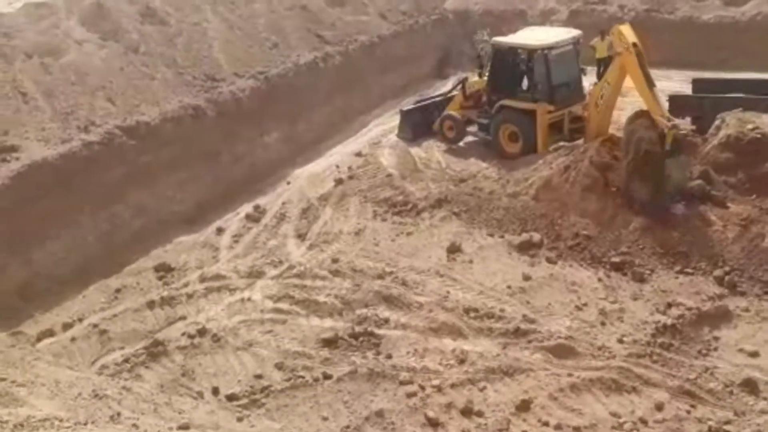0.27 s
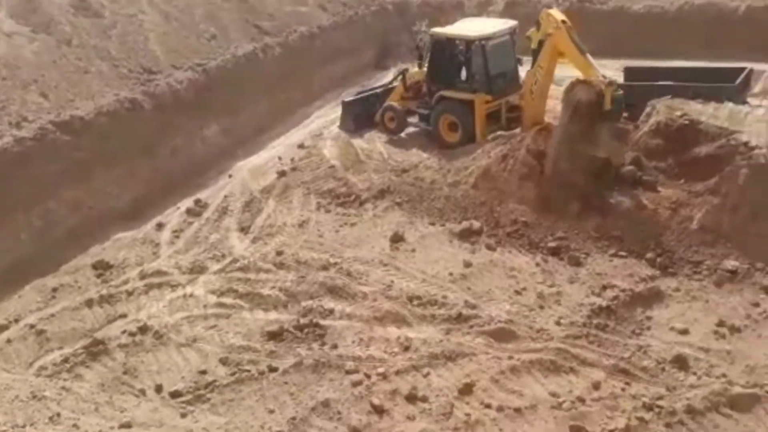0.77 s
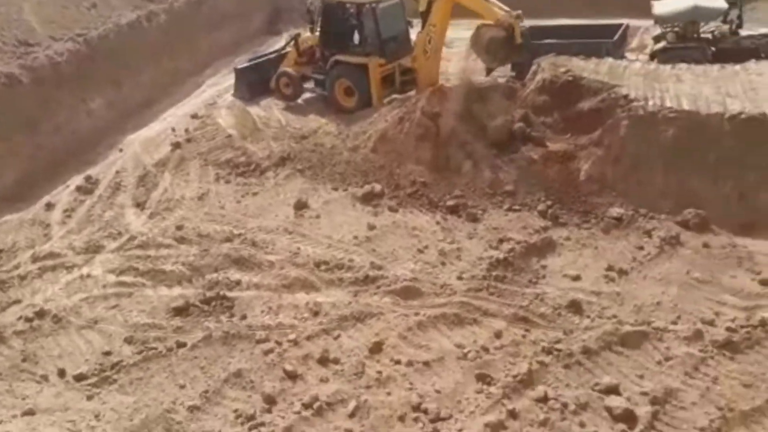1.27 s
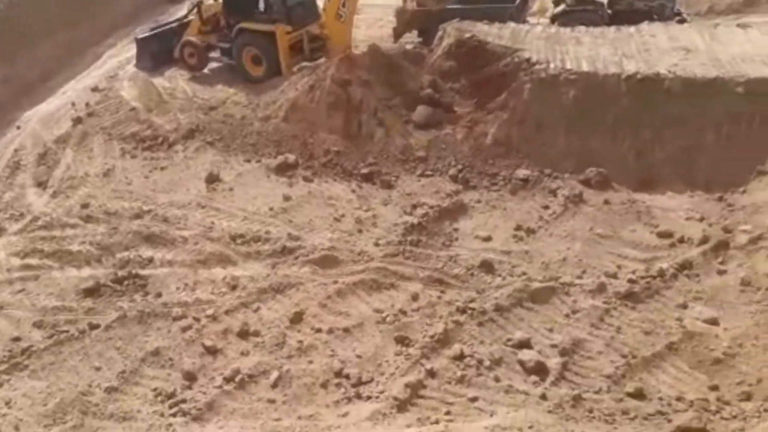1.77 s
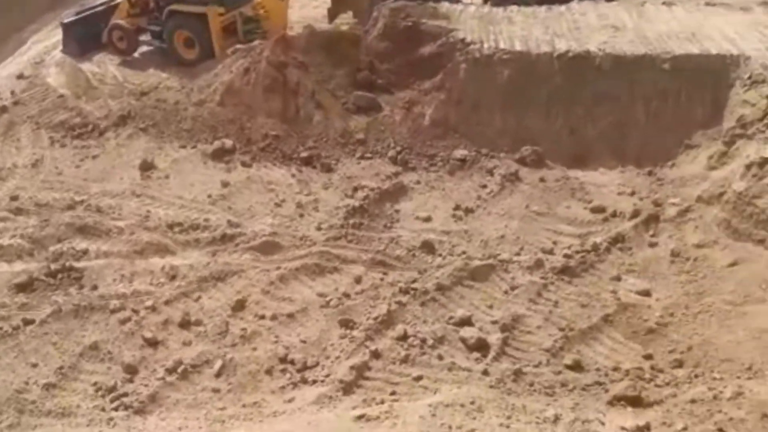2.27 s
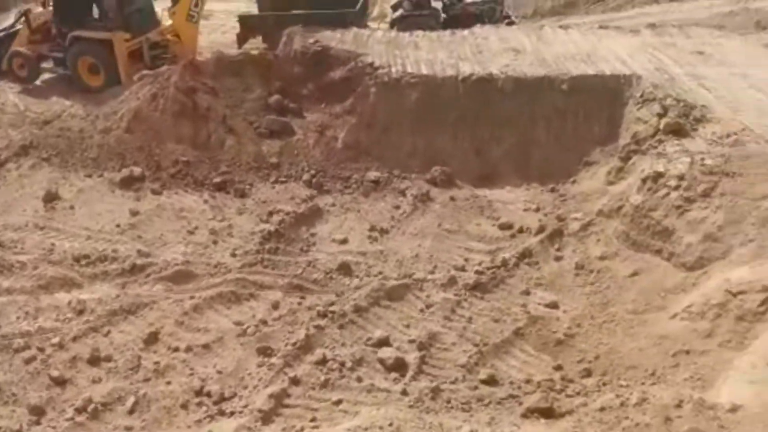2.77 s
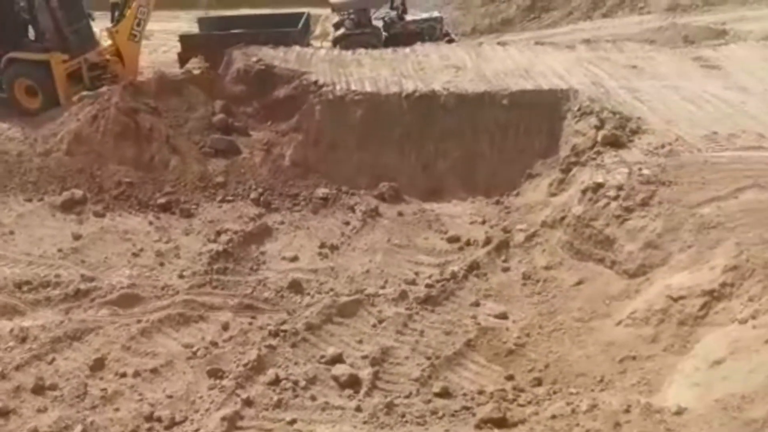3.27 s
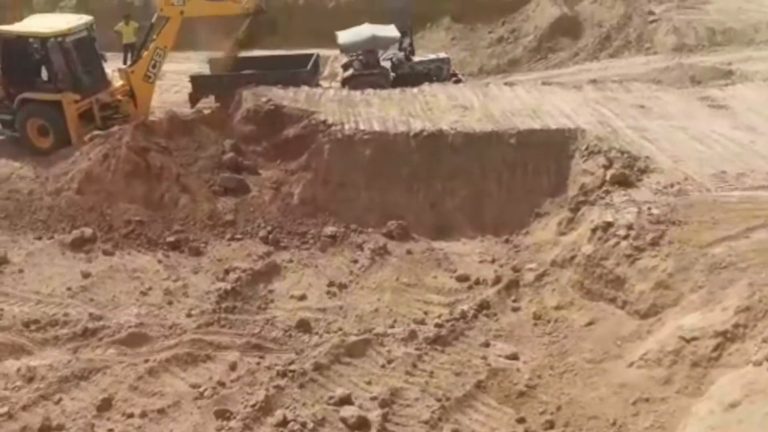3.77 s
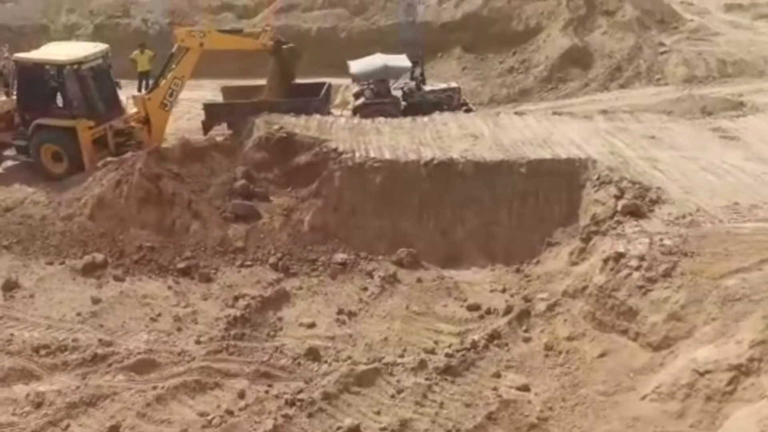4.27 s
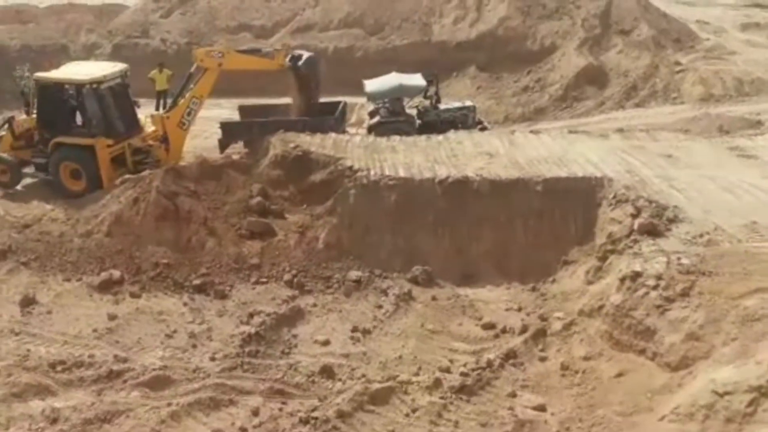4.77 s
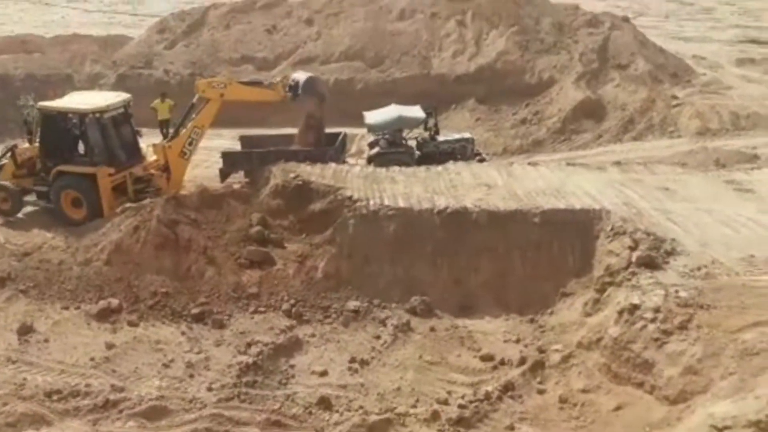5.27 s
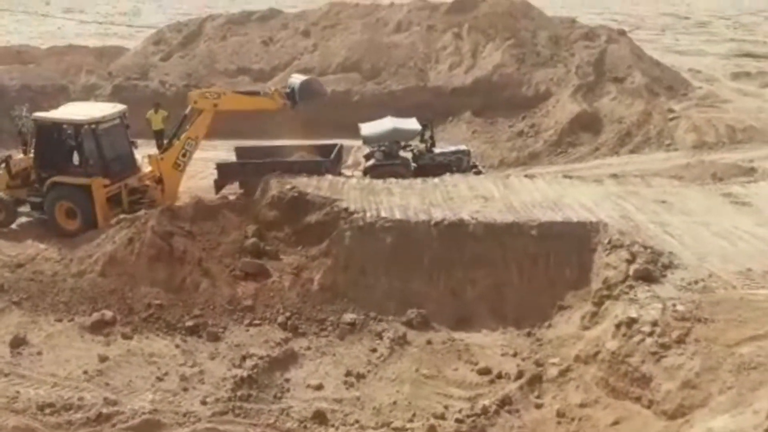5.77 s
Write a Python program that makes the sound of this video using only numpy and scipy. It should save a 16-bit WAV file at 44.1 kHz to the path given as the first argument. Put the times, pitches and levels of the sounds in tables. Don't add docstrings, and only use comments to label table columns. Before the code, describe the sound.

Strong wind booms and tears across a hand-held microphone, then sand and stones crunch on a steel bucket over a distant diesel clatter.

```python
import sys
import numpy as np
from scipy import signal
from scipy.fft import rfft, irfft, next_fast_len
from scipy.io import wavfile
from scipy.ndimage import uniform_filter1d

SR = 44100
rng = np.random.default_rng(int(sys.argv[2]) if len(sys.argv) > 2 else 0)


def how_loud(loudness_db):
    steps = np.asarray(loudness_db, float) / 20
    return 10 ** steps


def materialize(psi):
    bounded = np.clip(np.atleast_2d(psi).T, -1, 1)
    quanta = np.round(bounded * 32767).astype(np.int16)
    wavfile.write(sys.argv[1], SR, quanta)


N = 264688
TIME = np.arange(N) / SR


def level(x, db=0):
    return x * how_loud(db) / np.sqrt(np.mean(x ** 2, axis=-1, keepdims=True))


def noise(channels=2):
    return rng.standard_normal((channels, N))


def colour(x, points):
    size = next_fast_len(N)
    hz, db = np.transpose(points)
    bins_hz = np.arange(size // 2 + 1) * SR / size
    gain = how_loud(np.interp(np.log(bins_hz + 1), np.log(hz), db))
    return irfft(rfft(x, size) * gain, size)[..., :N]


def ring(x, hz, width):
    return signal.lfilter(*signal.iirpeak(hz, hz / width, SR), x)


def dull(x, hz):
    return signal.sosfilt(signal.butter(3, hz, fs=SR, output="sos"), x)


def under(x, hz):
    return signal.sosfiltfilt(signal.butter(2, hz, fs=SR, output="sos"), x)


def walk(rate, channels=1):
    k = int(SR / rate)
    held = np.repeat(rng.standard_normal((channels, N // k + 1)), k, axis=1)
    slewed = uniform_filter1d(uniform_filter1d(held, k), k)
    return 1.28 * slewed[:, :N]


def columns(table):
    s, *rest = np.transpose(table)
    return [np.interp(TIME, s, column) for column in rest]


def bump(s, half):
    return np.exp(-((TIME - s) / half) ** 2)


def sides(pan_db):
    return how_loud(np.array([pan_db, -pan_db]) / 2)


def ports(x, y, alike):
    lag = 5
    near = alike * np.roll(x, lag) + np.sqrt(1 - alike ** 2) * y
    return np.array([x, y + under(near - y, 3440.0)])


def eddies(table, width, top_hz, gain_db):
    size, shared = 6000, 0.29
    out, t = np.zeros((2, N + size)), np.arange(size) / SR
    puffs = rng.standard_normal((len(table), 2, size))
    for (s, db, hz, pan_db, length), puff in zip(table, puffs):
        puff = puff + shared * (puff[0] - puff)
        age = t / max(length, .001)
        shape = (1 - np.exp(-7 * age)) * np.exp(-age)
        burst = dull(ring(ring(puff * shape, hz, width), hz, 3 * width), top_hz)
        burst = burst / abs(burst).max(axis=1, keepdims=True)
        i = int(s * SR)
        out[:, i:i + size] += how_loud(db + gain_db) * sides(pan_db)[:, None] * burst
    return out[:, :N]


# time in seconds, strength in dB,
# angle (0 = along the cavity mouth, 1 = across its edge).
WIND = [(0.0, -30.5, 0.35), (0.22, -32.5, 0.46), (0.42, -40.5, 0.16), (0.7, -39.5, 0.2), (0.9, -35, 0.15),
        (1.33, -33, 0.23), (1.5, -29, 0.18), (1.8, -28.5, 0.45), (2.2, -33.5, 0.41), (2.5, -28, 0.13),
        (2.75, -33.5, 0.048), (3.05, -30.5, 0.17), (3.2, -30.5, 0.7), (3.55, -42.5, 0.82),
        (3.9, -26.5, 0.65), (4.32, -38, 0.82), (4.5, -49, 0.97), (6.0, -46.5, 0.8)]
# time in seconds, change in dB, half length in seconds,
# veer of the angle.
SURGES = [(0.0, 17, 0.0098, 0.45), (0.042, 1, 0.042, 0.19), (0.271, -3.5, 0.029, 0.17),
          (0.812, -18.5, 0.041, 0.18), (1.16, 2, 0.011, 0.0053), (1.304, 8.5, 0.028, 0.22),
          (1.438, -7.5, 0.055, 0.29), (1.63, -1, 0.028, -0.13), (1.722, 8, 0.028, -0.36),
          (1.8, 3, 0.036, 0.067), (1.962, -3, 0.013, 0.0085), (1.992, 6, 0.01, -0.051),
          (2.117, 8, 0.083, -0.16), (2.202, -4, 0.012, -0.34), (2.284, 4.5, 0.025, -0.1),
          (2.404, 10, 0.018, -0.33), (2.697, -16, 0.013, 0.028), (2.799, 5.5, 0.049, 0.076),
          (2.879, -21, 0.055, 0.26), (3.154, 9, 0.024, 0.27), (3.399, -15.5, 0.062, -0.12),
          (3.592, 16, 0.038, -0.17), (4.039, -26, 0.0082, 0.12), (3.861, -17, 0.0056, 0.14),
          (4.103, -11, 0.058, -0.16), (4.26, -8.5, 0.056, -0.059), (4.327, 3.5, 0.04, -0.36),
          (5.263, -2, 0.017, 0.037), (5.383, 5, 0.026, 0.22), (5.518, 7, 0.01, -0.33),
          (0.061, -5, .006, -0.095), (0.943, -9, 0.0065, 0.061), (1.354, -8, 0.0065, 0.081),
          (1.862, 4, 0.0044, -0.056), (1.95, -2, 0.012, 0.14), (2.028, -6.5, 0.0085, -0.18),
          (2.38, -7, 0.0052, 0.12), (2.479, -7, 0.0089, -0.27), (3.006, -9, .005, 0.051),
          (3.706, -8, 0.019, -0.049), (3.759, -12, 0.01, -0.03), (3.773, 1.5, 0.0075, -0.1),
          (3.985, -9, 0.0093, 0.087), (4.6, 3, 0.02, .01), (5.036, -4, 0.058, 0.061)]
# time in seconds, change in dB.
SWELLS = [(.35, 3), (.5, -1), (.72, 3), (.95, 3), (1.62, 2.5), (1.8, -3), (2.05, -3.5), (2.4, 2),
          (2.65, 1.5), (3.159, 1.5), (3.28, 3), (3.44, 3.5), (3.73, -0.5), (4.6, -5.5), (5.15, 1),
          (5.4, -6), (5.56, 4), (5.95, 0)]


def gusts():
    wind_db, angle = columns(WIND)
    surge_db = 0
    for s, db, half, veer in SURGES:
        gust = bump(s, max(half, .005))
        surge_db = surge_db + db * gust
        angle = angle + veer * gust
    angle = np.clip(angle, 0, 1.2)
    now_db = wind_db + surge_db
    cavity_db = now_db + 8.5 - 79 * (angle - 0.35) ** 2
    edge_db = now_db + 9.5 - 42 * np.exp(-angle / 0.11)
    pan_db = 0.1346 * (-24.5 - now_db) + 0.5 * walk(12)[0]
    swell_db = sum(db * bump(s, 0.038) for s, db in SWELLS)
    rumble_db = wind_db + swell_db + 0.61 * surge_db
    return rumble_db, cavity_db, edge_db, pan_db


# frequency in Hz, level in dB per Hz.
RUMBLE = [(25, -28), (50, -7), (80, -5.5), (150, -2), (300, 1.5), (450, 2.5), (700, -7), (1500, -44.5)]
# frequency in Hz, level in dB per Hz.
EDGE = [(500, -18), (900, -2), (1150, 4), (1500, -3), (2200, -13.5), (3200, -22.5), (5000, -41.5),
        (8000, -95)]
# frequency in Hz, width in Hz, level in dB.
OVERTONES = [(2650, 470, -33), (3410, 330, -39), (4570, 250, -43.5)]


def wind():
    rumble_db, cavity_db, edge_db, pan_db = gusts()
    swirl = 1.6 * walk(45) + 2.6 * walk(60, channels=2) + 3 * walk(220, channels=2)
    top_db = 5.5
    swirl = np.where(swirl > 0, top_db * np.tanh(swirl / top_db), swirl)
    swirl = swirl - sum(5.5 * bump(s - 0.008, 0.0033) for s, *_ in EDDIES)
    swirl = swirl - sum(4 * bump(s - 0.0036, 0.0034) for s, *_ in SNAPS)

    rumble_flutter = 0.99 * swirl + 2.4 * walk(18, channels=2) + 0.11 * walk(9.2)
    rumble = level(how_loud(rumble_flutter) * colour(noise() + 0.43 * noise(channels=1), RUMBLE))

    jet = noise() * how_loud(swirl)
    cavity_hz = 768
    cavity = level(dull(ring(ring(jet, cavity_hz, 264), cavity_hz, 920.0), 1920.0))
    for hz, width, db in OVERTONES:
        cavity = cavity + level(ring(ring(jet, hz, width), hz, width), db)

    edge = level(colour(noise() * how_loud(1.03 * swirl + 2.1 * walk(40, channels=2)), EDGE))
    layers = how_loud(rumble_db + 1.5) * rumble + how_loud(cavity_db - 0.5) * cavity + how_loud(edge_db - 6.5) * edge
    return sides(pan_db) * layers


# frequency in Hz, level in dB per Hz.
ENGINE = [(24, -35), (40, 4), (136, 8), (332, -2), (737, -41), (1180, -12), (1640, -24), (1850, -11.5),
          (2760, -14.5), (4540, -17.5), (7660, -25.5), (8460, -22.5), (10600, -32), (12900, -31.5),
          (15400, -29)]
# time in seconds, clatter in dB.
LOAD = [(0.0, -61), (0.67, -65), (1.79, -62.5), (2.15, -63), (2.55, -62), (2.95, -58), (3.18, -53.5),
        (4.2, -48.5), (4.83, -55.5), (5.53, -47.5), (6.0, -54)]


def engine():
    firing_hz = 58.6 * (1 + 0.031 * walk(2.9)[0])
    phase = np.cumsum(firing_hz) / SR
    strength = how_loud(2.5 * rng.standard_normal(N // 100))
    knock = strength[phase.astype(int)] * np.exp(-(phase % 1) / .3)
    clatter = ports(*(noise() * (1.5 + knock) * how_loud(1.2 * walk(5))), alike=.5)
    body = level(colour(clatter, ENGINE), -40.5)
    body = body + level(ring(clatter, 4050., 250.), -65) + level(ring(clatter, 2150., 250.), -66)
    load_db, = columns(LOAD)
    drone = under(body, 4300.)
    bass = under(drone, 500.0)
    drift = 0.61 * walk(40) + 0.51 * walk(25, channels=2)
    bass_change = bass * (how_loud(6.4 * np.tanh(drift) - 7.0) - 1)
    return drone + bass_change + (body - drone) * how_loud(0.68 * (load_db - load_db[-1]))


# start in seconds, peak in dB, frequency in Hz, left minus right in dB.
THUMPS = [(0.021, -35, 72.7, 12), (0.088, -28, 96.9, 8), (0.267, -31, 117, 0), (0.335, -31, 117, 1),
          (0.591, -35, 86.6, -7), (0.673, -34, 116, -3), (0.927, -49, 129, -2.0), (0.928, -28.5, 120, 7),
          (1.194, -31, 94.2, 1.0), (1.336, -37, 99.6, 4), (1.497, -28, 70.0, 6), (1.629, -23, 108, 1),
          (1.764, -26.5, 128, 3.0), (1.908, -30, 130, 2), (1.997, -38, 129, -7), (2.153, -31, 102, 5),
          (2.356, -40, 129, 9), (2.357, -32, 88.8, 1.5), (2.786, -34, 129, -3), (2.974, -31, 102, -8.5),
          (3.134, -30, 129, -4), (3.5, -36, 129, 2), (3.712, -35.5, 91.5, 9), (3.841, -30, 88.8, -2),
          (4.056, -35, 119, 7), (4.138, -25, 96.9, 7), (4.646, -44, 129, -6.5), (4.645, -32, 102, -1),
          (5.214, -42, 129, -4.5), (5.215, -31.5, 129, -3), (5.499, -30.5, 108, -5), (5.626, -36, 80.7, -5)]


def thumps():
    length = 0.023
    return eddies([(*row, length) for row in THUMPS], width=40.0, top_hz=300.0, gain_db=-3.5)


# start in seconds, peak in dB, ring in Hz, length in seconds.
EDDIES = [(0.056, -16.5, 900, 0.07), (0.108, -9.5, 810, 0.0033), (0.178, -19.5, 745, .018),
          (0.903, -27, 800, 0.0015), (1.059, -30, 826, 0.0068), (1.289, -15.5, 734, 0.018),
          (1.511, -16, 860, 0.031), (1.581, -25, 1020, 0.0063), (1.611, -12, 784, 0.0095),
          (1.734, -8.5, 1070, 0.0067), (1.767, -4, 834, 0.0097), (1.86, -18.5, 920, 0.055),
          (1.923, -10, 666, 0.0036), (2.098, -13, 820, 0.0025), (2.415, -10, 880, 0.0063),
          (2.297, -13.5, 864, 0.013), (2.385, -14.5, 820, 0.027), (2.495, -28, 762, 0.032),
          (2.972, -15, 705, 0.024), (3.013, -17, 867, 0.0023), (3.115, -19, 716, 0.017),
          (3.241, -16, 1220, 0.015), (3.267, -18, 1170, 0.0057), (3.602, -28, 1340, 0.0051),
          (4.137, -21.5, 1280, 0.017), (3.814, -16, 644, 0.018), (3.831, -13.5, 1140, 0.008),
          (3.939, -12.5, 1160, 0.017), (4.05, -19.5, 690, 0.0099), (4.378, -19.5, 640, 0.0071)]


def sudden_eddies():
    pans_db = 2.5 + 3.5 * rng.standard_normal(len(EDDIES))
    table = [(s, db, hz, pan_db, length) for (s, db, hz, length), pan_db in zip(EDDIES, pans_db)]
    return eddies(table, width=450., top_hz=2600., gain_db=0)


# start in seconds, peak in dB, frequency in Hz, left minus right in dB,
# length in seconds.
BUFFETS = [(0.091, -18, 214, 5, 0.022), (0.337, -21, 114, -3, 0.022), (0.65, -17.5, 211, -1, 0.023),
           (0.855, -18, 180, -6, 0.042), (1.197, -16.5, 210, 6, 0.049), (1.344, -21, 70.0, 5, 0.03),
           (1.495, -33, 156, -1, 0.027), (1.615, -17, 148, 5, 0.04), (1.762, -15.5, 183, 10, 0.041),
           (2.344, -13, 218, 0, 0.047), (2.775, -16, 175, 0, 0.011), (2.959, -16.5, 213, -1, 0.018),
           (3.117, -21, 190, 3, 0.019), (3.505, -15, 134, 0, 0.057), (4.074, -13.5, 172, 3.5, 0.018),
           (4.332, -23, 238, 4, 0.094), (5.215, -48, 51.1, 3, 0.027), (5.216, -25, 71, -3, 0.05),
           (5.628, -27, 78.1, -7, 0.04), (4.675, -25, 300, -1, 0.0052), (4.77, -27, 224, 0, 0.0044),
           (4.912, -35, 250, -2, 0.0087), (5.14, -26.5, 242, 0, 0.0059), (5.68, -24.5, 278, 3, 0.011)]


def buffets():
    return eddies(BUFFETS, width=78.0, top_hz=470.0, gain_db=-8.0)


# start in seconds, peak in dB, ring in Hz, left minus right in dB.
SNAPS = [(0.111, -6.5, 746, 0), (0.294, -25, 980, 12), (0.398, -22, 786, 14), (0.539, -24.5, 780, 13),
         (0.905, -13.5, 794, 0.5), (0.959, -21, 845, 1.5), (0.975, -16.5, 710, 10), (1.011, -22, 673, 10),
         (1.066, -30, 821, 9), (1.136, -17, 721, 8), (1.163, -14.5, 760, -5), (1.29, -11, 694, 0),
         (1.301, -14, 895, 0.5), (1.369, -17, 789, -5), (1.465, -13, 988, 4), (1.515, -7.5, 880, -8),
         (1.579, -12, 1020, 0.0), (1.609, -4, 765, 0.0), (1.641, -9, 840, 2), (1.666, -10, 790, -3),
         (1.764, -5.5, 740, 3), (1.774, -4, 790, 1.0), (1.794, -14, 894, 2), (1.881, -8, 945, 6),
         (1.97, -12.5, 1050, 1.0), (1.997, -9.5, 900, 2), (2.041, -27, 770, 3), (2.101, -5.5, 825, 2),
         (2.126, -8, 820, 1.0), (2.222, -14.5, 1000, 3), (2.273, -18, 748, -1), (2.351, -18, 764, 1.0),
         (2.494, -23, 770, 3.0), (2.637, -22, 557, 7), (2.666, -18.5, 690, -4), (2.767, -19, 774, 0.0),
         (2.797, -14.5, 726, 4), (2.986, -11, 930, 0.5), (3.114, -11, 683, -3), (3.131, -19, 1090, 6),
         (3.274, -14, 1130, -0.5), (3.507, -24, 576, -4), (3.598, -11, 1410, -1), (3.767, -26, 1100, 4.0),
         (3.872, -23, 726, -1), (3.943, -14, 1350, 3), (4.052, -25, 600, 4)]


def snaps():
    size = 1500
    out = np.zeros((2, N + size))
    push = np.pad(np.hanning(17), (0, size - 17))
    crack = ring(push, 1650.0, 2200.)
    crack = how_loud(-20) * crack / abs(crack).max()
    damping = 1 + .4 * np.tanh(rng.standard_normal(len(SNAPS)))
    for (s, db, hz, pan_db), damp in zip(SNAPS, damping):
        body = ring(ring(push, hz, 130 * damp), hz, 830.0)
        blow = dull(body / abs(body).max() + crack, 3200.)
        i = int(s * SR)
        out[:, i:i + size] += how_loud(db - 3) * sides(np.clip(pan_db, -14, 14))[:, None] * blow
    return out[:, :N]


# frequency in Hz, level in dB per Hz.
GRIT = [(1940, -9.5), (3300, -0.5), (3520, 6), (3950, -4), (4300, 3.5), (5150, -2.5), (6740, -6.5),
        (8180, -10.5), (8450, -11), (9310, -12), (12300, -13.5), (14700, -19), (15400, -35)]


def sand_grains():
    impacts = noise() * how_loud(2.5 * rng.exponential(size=(2, N)) + 1.2 * walk(60))
    grains = ports(*impacts, alike=.75)
    return grains, level(colour(grains, GRIT))


# start in seconds, peak in dB, 60 dB decay time in seconds,
# brightness in dB above 8 kHz.
STONES = [(0.1111, -40, 0.048, -13), (0.18, -57, 0.12, 12), (0.34, -54, 0.1, 7), (1.119, -49, 0.039, 14),
          (1.4626, -47, 0.057, 5), (1.6087, -66, 0.054, -3), (2.0702, -50, 0.061, 14),
          (2.931, -54, 0.074, 16.5), (3.092, -41, 0.19, 3), (3.1325, -37.5, 0.072, 21.5),
          (3.225, -43, 0.16, 13.5), (3.448, -50, 0.094, 5), (3.529, -51, 0.083, 3), (3.5997, -45, 0.06, -6),
          (3.664, -44.5, 0.083, 9.5), (3.9604, -42.5, 0.15, 13.5), (4.0015, -37, 0.068, 7),
          (4.2765, -38.5, 0.046, 5), (4.9752, -40.5, 0.1, 0), (5.379, -41, 0.11, -3),
          (5.6474, -43, 0.24, -10)]


def stones(grit):
    out, low = np.zeros((2, N)), under(grit, 8400.0)
    for s, db, t60, bright_db in STONES:
        span = slice(int(s * SR), int((s + .3) * SR))
        age = TIME[span] - s
        attack = np.clip(age / 0.0033, 0, 1)
        fade = how_loud(db + 2.0 - 60 * age / max(t60, .005)) * attack
        out[:, span] += fade * (low[:, span] + how_loud(bright_db) * (grit - low)[:, span])
    return out


# frequency in Hz, width in Hz, level in dB.
STEEL = [(2030, 320, 17), (2700, 590, 10.5), (3570, 280, -1), (1250, 350, 8.5)]


def steel(x):
    return sum(how_loud(db) * ring(ring(x, hz, width), hz, 3 * width) for hz, width, db in STEEL)


# start in seconds, hold in seconds, grit in dB, steel ring in dB.
SLIDES = [(2.945, 0.017, -40, -34.5), (3.126, 0.035, -31.5, -29), (3.148, 0.19, -41, -39),
          (3.437, .01, -45, -45), (3.525, 0.018, -37.5, -36.5), (3.599, 0.028, -31, -25.5),
          (3.673, .02, -41.5, -41), (3.712, 0.32, -43, -40), (3.94, 0.065, -32.5, -31.5),
          (4.022, 0.058, -33, -37), (4.128, 0.026, -34, -32), (4.165, 0.079, -36.5, -37.5),
          (4.368, 0.0094, -39, -34), (4.417, 0.19, -41, -45.5), (3.33, 0.13, -52, -47.5),
          (4.62, 0.26, -58, -73), (3.277, 0.022, -36.5, -42), (4.488, .015, -42, -43.5),
          (4.587, 0.024, -50, -38)]


def slides(grains, grit):
    grit_gain, plate_gain, attack = 0, 0, 0.0042
    for s, hold, grit_db, ring_db in SLIDES:
        rise = np.clip((TIME - s) / attack, 0, 1)
        after = np.maximum(TIME - s - attack - hold, 0)
        grit_gain = np.maximum(grit_gain, rise * how_loud(grit_db - 131 * after))
        plate_gain = np.maximum(plate_gain, rise * how_loud(ring_db - 250 * after))
    hiss = grit * grit_gain * how_loud(-3.5 + 1.4 * walk(30))
    plate = level(steel(grains)) * plate_gain * how_loud(3.3 * np.tanh(walk(70)))
    return hiss + plate


# start in seconds, peak in dB, frequency in Hz,
# left minus right in dB, length in seconds.
SCRAPE = [
    (3.575, -21, 1510, -2, .008),
    (3.598, -13, 1770, 1.1, 0.0082),
    (3.611, -16, 2160, 1.1, 0.012),
    (3.626, -21.5, 2070, 9, .013),
    (3.648, -17, 1900, -1, 0.012),
]


def scrape():
    return eddies(SCRAPE, width=290.0, top_hz=6000., gain_db=-2.5)


# start in seconds, peak in dB, ring in Hz.
POPS = [(4.441, -29, 1090), (4.485, -28, 2030), (4.511, -34, 2050), (4.573, -30, 1880), (4.59, -29, 1740),
        (4.655, -30, 1140), (4.699, -36, 1230), (4.721, -35, 1190), (4.776, -43, 1090), (4.797, -41, 1100),
        (4.829, -31, 1160), (4.876, -27.5, 1200), (4.914, -35, 1220), (4.933, -27.5, 1200),
        (5.03, -27.5, 1220), (5.067, -49, 1110), (5.101, -33, 1150), (5.136, -34, 1040), (5.18, -30, 1040),
        (5.223, -33, 1180), (5.238, -27.5, 1120), (5.249, -26.5, 955), (5.334, -44, 1340),
        (5.36, -31, 1410), (5.369, -30, 1330), (5.387, -32, 1020), (5.434, -40, 1390), (5.45, -39, 1480),
        (5.475, -38, 1470), (5.517, -30, 1250), (5.543, -26, 1080), (5.554, -26.5, 985), (5.582, -26, 1020),
        (5.657, -48, 1080), (5.687, -33, 1260), (5.741, -27, 1250), (5.784, -30, 1380),
        (5.844, -28.5, 1050), (5.875, -29, 1370), (5.89, -26.5, 1140), (5.927, -24.5, 1150),
        (5.956, -38, 921), (5.965, -33, 1010)]


def pops():
    pan_db, length = 7.5, 0.0033
    table = [(*row, pan_db, length) for row in POPS]
    return eddies(table, width=460.0, top_hz=3240.0, gain_db=-3.0)


# start in seconds, peak in dB, frequency in Hz,
# left minus right in dB, length in seconds.
PUFFS = [(4.568, -29, 151, -0.5, 0.0098), (4.76, -42, 72.7, 3, 0.012), (4.766, -34, 148, -2, 0.0084),
         (4.904, -28, 227, -2.0, 0.0099), (5.015, -52, 113, -9, 0.012), (5.204, -37, 145, 0.0, 0.012),
         (5.27, -31, 116, -6, 0.012), (5.346, -33, 202, -8, 0.0091), (5.402, -43, 110, 1, 0.012),
         (5.489, -33, 121, -9, 0.014), (5.638, -38, 83.4, -7.0, 0.011), (5.819, -29, 175, -3, 0.014)]


def puffs():
    return eddies(PUFFS, width=90.0, top_hz=600., gain_db=-1.0)


def scene():
    air = sudden_eddies() + buffets() + pops() + thumps() + wind() + snaps()
    grains, grit = sand_grains()
    bucket = slides(grains, grit) + stones(grit)
    return air + bucket + engine() + puffs() + scrape()


def treble_gaps(x, from_hz, share, wind_share):
    hz, _, cells = signal.stft(x, SR, nperseg=1024)
    shape = (len(hz) // 8 + 1, cells.shape[2] // 2 + 1)
    chance = uniform_filter1d(rng.random(shape), size=2)
    chance = np.repeat(np.repeat(chance, 8, axis=0), 2, axis=1)[:len(hz), :cells.shape[2]]
    power = np.sum(abs(cells) ** 2, axis=(0, 1))
    loud_db = uniform_filter1d(10 * np.log10(power + 1e-12), size=9)
    depth = np.clip((hz - from_hz) / from_hz, 0, 1) + .6 * np.exp(-((hz - 8450) / 300) ** 2)
    shut = chance < depth[:, None] * (share + wind_share * (loud_db - loud_db.mean()))
    return signal.istft(cells * np.where(shut, .02, 1), SR, nperseg=1024)[1][:, :N]


def roll_off(x):
    return signal.sosfilt(signal.butter(12, 15530, fs=SR, output="sos"), x)


def record(dry):
    limit = 2.5
    overloaded = limit * np.tanh(dry / limit)
    notched = signal.lfilter(*signal.iirnotch(8400., 10., SR), overloaded)
    rolled_off = dull(notched, 15000.)
    soft_start = np.clip(np.arange(N) / 100, 0, 1)
    mix = treble_gaps(rolled_off * soft_start, from_hz=3600., share=.27, wind_share=.016)
    return roll_off(mix)


dry = scene()
out = record(dry)
materialize(out)
```